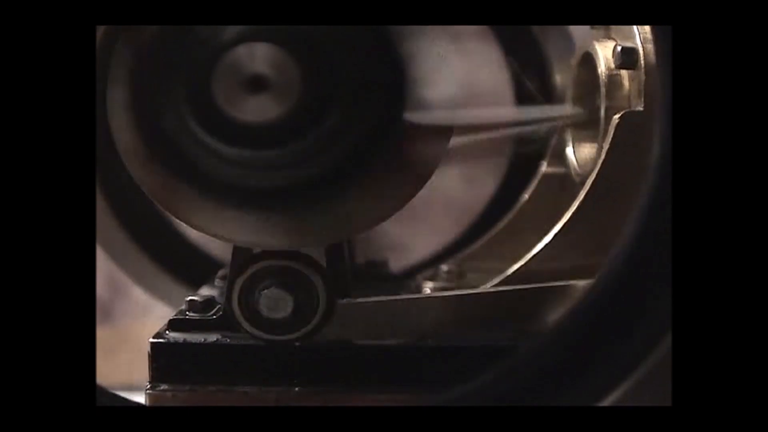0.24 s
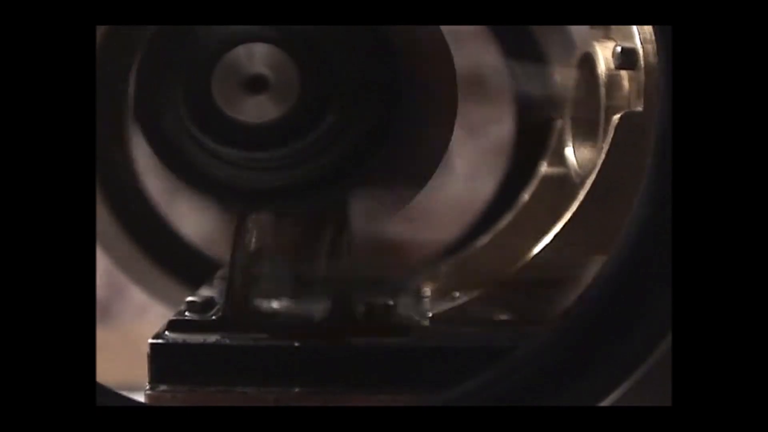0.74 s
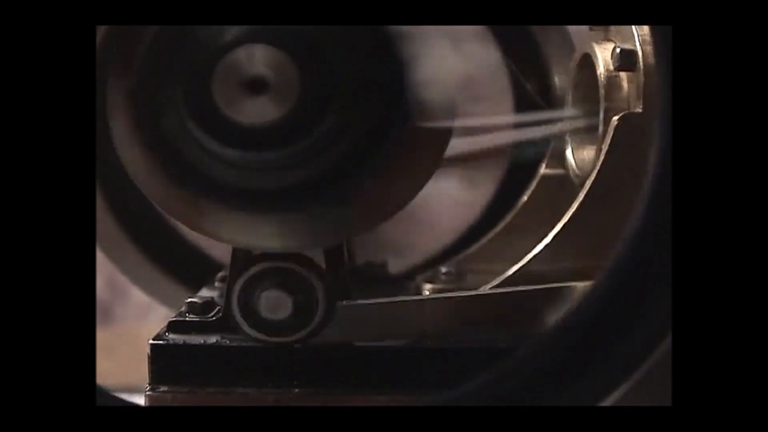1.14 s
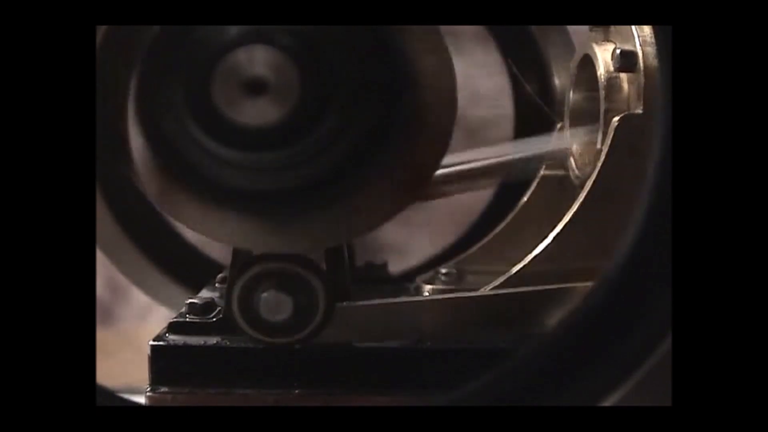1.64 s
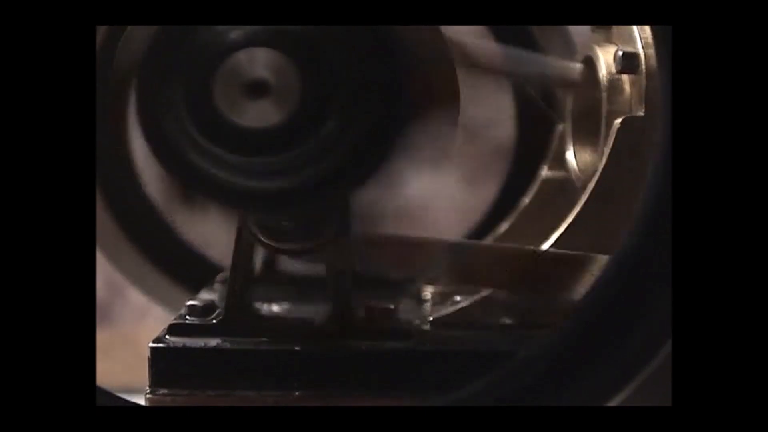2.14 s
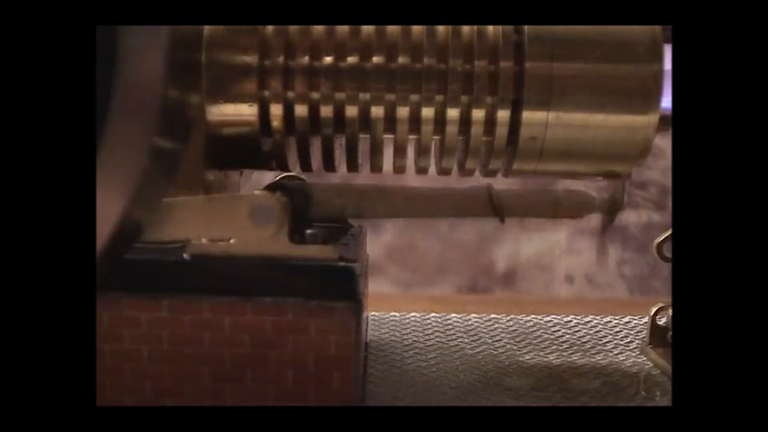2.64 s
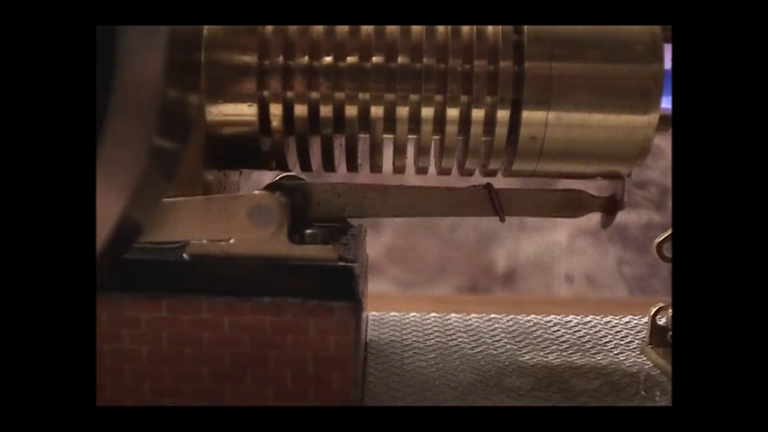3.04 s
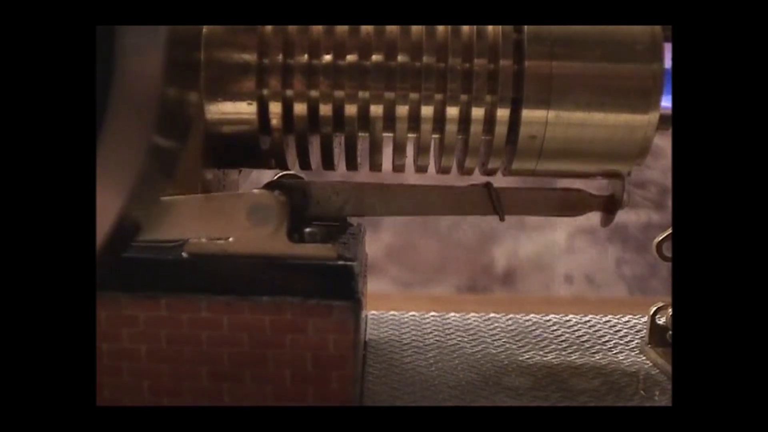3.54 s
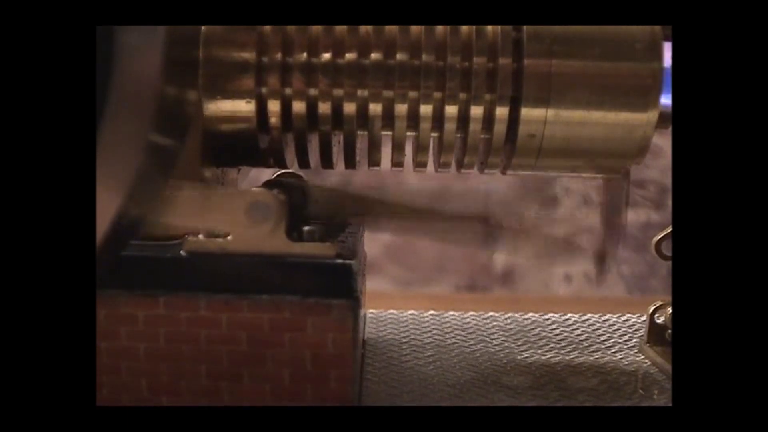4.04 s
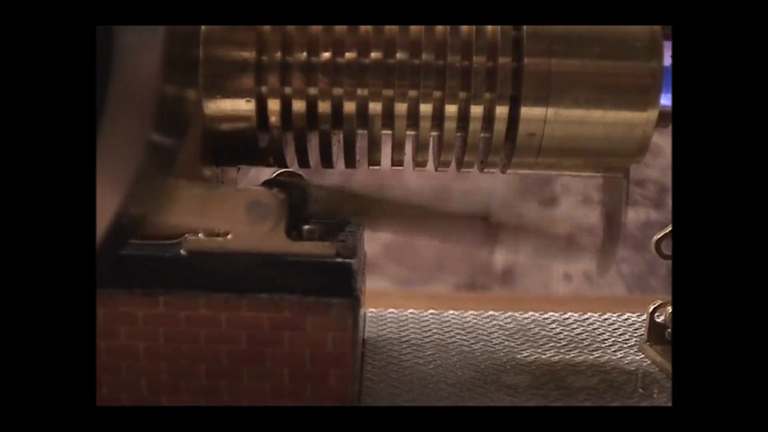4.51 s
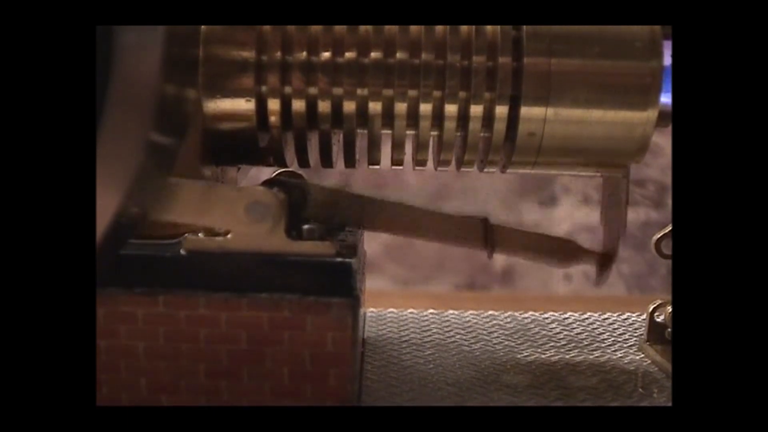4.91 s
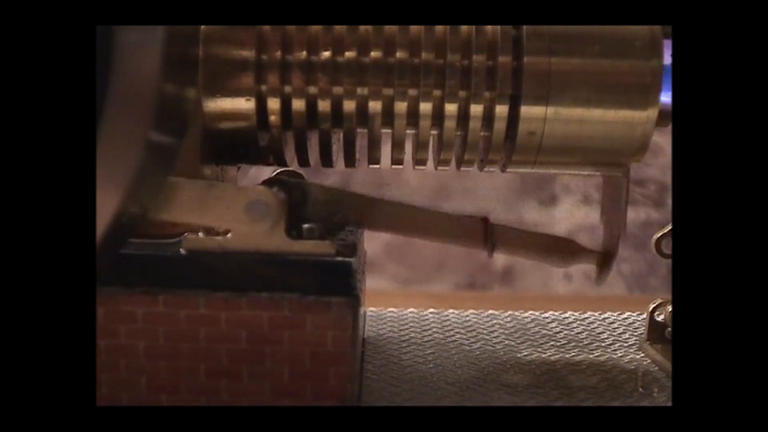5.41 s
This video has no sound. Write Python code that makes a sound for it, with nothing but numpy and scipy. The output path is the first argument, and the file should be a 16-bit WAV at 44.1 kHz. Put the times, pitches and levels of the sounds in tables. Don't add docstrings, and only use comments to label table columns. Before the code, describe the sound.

Steady, rapid mechanical chugging from a model engine on a bench, heard in close stereo. Dry brass ticks lead to a hard shutter clack, a short ringing hum near a high whistle pitch, and a sputtering exhaust valve. The cut near 2.5 seconds shifts the engine from slightly right to slightly left, with more shutter bounce and less base thud. Short room reflections, faint hiss and rumble continue to the end.

```python
import sys
import numpy as np
from scipy import signal
from scipy.fft import rfft, irfft
from scipy.io import wavfile
from scipy.ndimage import uniform_filter1d

SR = 44100
rng = np.random.default_rng(int(sys.argv[2]) if len(sys.argv) > 2 else 0)


def boost(x):
    u = np.asarray(x, float) / 20
    return 10 ** u


def inscribe(sig):
    pcm = np.round(np.clip(np.atleast_2d(sig).T, -1, 1) * 32767)
    wavfile.write(sys.argv[1], SR, pcm.astype(np.int16))


N = 250047
MOVE_S = 2.466


def place(s):
    return int(s > MOVE_S)


def ring(x, hz, t60_s):
    pole = np.exp(2j * np.pi * hz / SR - np.log(1000) / (t60_s * SR))
    return signal.lfilter([1], [1, -pole], x).imag


def ring_all(x, modes):
    return sum(boost(db) * ring(x, hz, t60_s) for hz, t60_s, db in modes)


def add(track, s, wave):
    at = int(s * SR)
    wave = wave[max(-at, 0):N - at]
    start = max(at, 0)
    track[start:start + len(wave)] += wave


# t/s, snap level/dB, third beat level/dB, damping/dB per beat squared
POPS = [(0.1102, -21, -15.5, 10), (0.262, -21, -14, 6.5), (0.4145, -22, -17, 7), (0.5651, -18, -14, 3),
        (0.7185, -21, -14.5, 8), (0.8701, -20.5, -16, 9), (1.0238, -21.5, -11.5, 7), (1.1763, -21, -18, 13),
        (1.3279, -19.5, -15.5, 14), (1.4824, -19.5, -16, 8), (1.6357, -19.5, -13.5, 8.5),
        (1.7902, -20, -16.5, 4.4), (1.9448, -20.5, -14.5, 19), (2.0986, -19.5, -16.5, 7),
        (2.254, -20.5, -16, 1.2), (2.408, -20.5, -15.5, 4.5)] + [(2.5798, -20, -26, 5.6), (2.708, -17, -23.5, 7.7), (2.837, -17.5, -25.5, 9.7),
                            (2.9646, -18.5, -28.5, 4.4), (3.0933, -18, -25.5, 6.7),
                            (3.2212, -17, -19.5, 11), (3.3486, -20, -17.5, 3.1), (3.4759, -19, -18.5, 5.5),
                            (3.6047, -21.5, -19, 4.7), (3.7323, -21, -20, 7.7), (3.861, -18, -16, 3.2),
                            (3.9899, -19.5, -15.5, 3.4), (4.1196, -20.5, -24.5, 7.7), (4.248, -20, -19, 11),
                            (4.378, -22.5, -17, 14), (4.508, -19.5, -16.5, 10), (4.638, -20, -20.5, 3),
                            (4.7666, -20.5, -16.5, 4), (4.8973, -21, -18.5, 7.7), (5.0264, -20, -17.5, 6),
                            (5.156, -19.5, -20, 4.6), (5.2863, -20, -15.5, 3.5),
                            (5.4163, -20.5, -16.5, 5.3), (5.547, -20.5, -16.5, 2.2)]
# beat/s, first beat level/dB, snap f/Hz, snap fade/s
POP = [
    (0.00359, -16.5, 3360, 0.00011),
    (0.003395, -20, 2760, 0.00033),
]
SECOND_BEAT_DB = (-25, -22)
# f/Hz, t60/s, level/dB
PORT_MODES = [(260.2, 0.028, -2.5), (480, 0.012, -22.5), (541, 0.019, -6.5), (630, 0.0079, -24.5),
              (1120, 0.0033, -1.5)]
FLUTTER_RISE_DB = 5.5


def pops():
    snaps, puffs = np.zeros(N), np.zeros(N)
    t = np.arange(-60, 200) / SR
    puff = np.gradient(np.hanning(44))
    late_beat = np.arange(4)
    for (s, snap_db, third_db, damping_db), chance in zip(POPS, rng.standard_normal((len(POPS), 6))):
        beat_s, first_db, snap_hz, snap_fade_s = POP[place(s)]
        late_db = third_db + FLUTTER_RISE_DB * late_beat - damping_db * late_beat ** 2
        for k, db in enumerate([first_db, SECOND_BEAT_DB[place(s)], *late_db]):
            lag_s = beat_s * k * (1 - 0.018 * k)
            jitter_s = 0.00015 * chance[k] * (k > 0)
            add(puffs, s - .0007 + lag_s + jitter_s, boost(db) * puff)
        fade = np.exp(-np.abs(t) / np.where(t < 0, .00025, snap_fade_s))
        add(snaps, s + t[0], boost(snap_db + 12.0) * fade * np.cos(2 * np.pi * snap_hz * t))
    return snaps + ring_all(puffs, PORT_MODES)


# knock f/Hz, knock fade/s, hum f/Hz, sag share, sag/s,
# swell level/dB, swell fade/s, hum level/dB, hum fade/s
PING = [
    (1782, 0.0016, 941, 0.33, 0.002, -10, 0.0036, -16, 0.042),
    (1777, 0.0022, 955, 0.24, 0.0028, 0.5, 0.0024, -21.5, 0.061),
]
# knock sag share, neighbour f/Hz, neighbour level/dB, fade/s, leak level/dB
BESIDE = [
    (0.75, 1040, -17, 0.0044, -28),
    (0.083, 760, -50, 0.049, -46),
]


def pings(seals):
    out = np.zeros(N)
    pop_s = np.append(np.array(POPS)[:, 0], N / SR)
    leak = ring(rng.standard_normal(N), hz=1920, t60_s=0.0051)
    leak /= np.std(leak)
    for (s, db), chance in zip(seals, rng.standard_normal((len(seals), 8))):
        knock_hz, knock_fade_s, hum_hz, sag, sag_s, *levels = PING[place(s)]
        swell_db, swell_fade_s, hum_db, hum_fade_s = levels
        knock_sag, beside_hz, beside_db, beside_fade_s, leak_db = BESIDE[place(s)]
        t = np.arange(int((pop_s[pop_s > s][0] - s) * SR)) / SR
        hum_fade = np.exp(-t / hum_fade_s)

        knock_sweep_hz = knock_hz * (1 + knock_sag * (np.exp(-t / 0.0022) - .6))
        knock = np.sin(2 * np.pi * np.cumsum(knock_sweep_hz) / SR)
        knock *= np.clip(t / .0005, 0, 1) * np.exp(-t / knock_fade_s)

        beside = boost(beside_db) * np.exp(-t / beside_fade_s) * np.sin(2 * np.pi * beside_hz * t)
        beside += boost(leak_db) * hum_fade * leak[int(s * SR):][:len(t)]

        phase = 2 * np.pi * np.cumsum(hum_hz * (1 + sag * np.exp(-t / sag_s))) / SR
        waver = boost(2.2 * np.interp(t, np.linspace(0, t[-1], 8), chance))
        size = boost(swell_db) * np.exp(-t / swell_fade_s) + boost(hum_db) * waver * hum_fade
        sealed = np.clip(t / .0025, 0, 1) * np.clip((t[-1] - t) / .002, 0, 1)
        add(out, s, boost(db) * (knock + sealed * (size * np.sin(phase) + beside)))
    return out


# whole turns made, t/s
CRANK = [
    [(-1, -.151), (0, .0003), (4, .6077), (8, 1.218), (12, 1.8321), (17, 2.6056)],
    [(-1, 2.3576), (0, 2.486), (6, 3.2553), (10, 3.7679), (14, 4.2839), (19, 4.9319), (25, 5.7127)],
]
# crank angle/turns, level/dB, drift/dB per turn, scatter/dB, scatter/s
TURN_NEAR = [
    (-.113, -43, -.25, 3, .0008),
    (-.0745, -22, -0.1, -1, .0002),
    (0, -25.5, 0, -2.45, 0.00022),
    (.05, -36, 0, 1.8, .0005),
    (0.148, -35.5, -0.15, -1.5, .0013),
    (.285, -24, -0.15, 0.1, 0.00036),
    (.353, -17, 0.02, -1, .0004),
    (.378, -9, -0.05, 0.1, .0004),
]
TURN_FAR = [
    (-.124, -38.5, 0.21, 7.1, 0.00076),
    (-.072, -26, 0.076, 0.94, .0002),
    (0, -23.5, 0, 2.7, 0.00016),
    (.04, -35.5, 0, 1.8, 0.00043),
    (.16, -45.5, 0.32, 1.3, 0.0042),
    (.281, -28, 0, 2, .0006),
    (.355, -16, 0, 0.72, .0002),
    (.381, -12.5, 0.054, 0.48, .0004),
]


def turning():
    kinds = [[] for _ in TURN_NEAR]
    for second, (crank, turn) in enumerate(zip(CRANK, (TURN_NEAR, TURN_FAR))):
        made, at_s = np.transpose(crank)
        count = np.arange(made[-1] + 1)
        for kind, (angle, db, drift_db, scatter_db, scatter_s) in zip(kinds, turn):
            late, strong = rng.standard_normal((len(count), 2)).T
            s = np.interp(count + angle, made, at_s) + scatter_s * late
            level_db = db + drift_db * count + scatter_db * strong
            heard = (s > MOVE_S) & (s < N / SR) if second else (s > 0) & (s < MOVE_S)
            kind += list(zip(s[heard], level_db[heard]))
    return kinds


def blows(events, chatter_s):
    out, t = np.zeros(N), np.arange(600) / SR
    repeat = .85
    shape = np.exp(-t / chatter_s) * (1 - np.exp(-t / (0.41 * chatter_s))) ** 2
    shape /= np.sqrt(np.sum(shape ** 2))
    habit = np.sign(rng.standard_normal(600))
    for (s, db, *_), grit in zip(events, rng.standard_normal((len(events), 600))):
        chatter = np.sqrt(repeat) * habit + np.sqrt(1 - repeat) * grit
        add(out, s - .0003, boost(db) * shape * chatter)
    return out


# lead/s, level/dB
SLIDE = [
    (.0075, -37.5),
    (.008, -39.5),
]
# lag/s, level/dB
BOUNCE = [
    [(.0035, -32), (.0065, -27)],
    [(.003, -8), (.0072, -15.5)],
]
# f/Hz, t60/s, level/dB first place, level/dB second place
FRAME_MODES = [(1164, 0.016, 8.5, 3), (1866, 0.0041, 7.5, -4.5), (2513, 0.009, -3, 5),
               (3120, 0.0043, 3.5, 0.5), (3743, 0.0052, 4.5, 2), (4730, 0.0029, -1.5, -4.5),
               (5710, 0.0022, 2.5, -1.5), (6560, 0.0076, 6, 3), (7690, 0.008, -3, -12),
               (8585, 0.0043, -1, 9.5), (9580, 0.0046, -3.5, -66), (11520, 0.01, -10, -2)]
# chatter/s, level/dB into each frame mode
REACH = [
    (0.0014, -12.5, 19, 7, 17, -49, 2, -63, -73, -40, -65, -26, -36),
    (0.00057, -18, -28, -6, -36, 3.5, -26, 12.5, -10, -26, -2.5, -36, -13),
    (0.0021, -7, -3, -24, -83, 3.5, -41, 8.5, 4.5, -30, -2, -46, -9),
    (0.0021, -7, -33, -61, -5, 14, -40, 13, 8.5, 13.5, 6, -31, -26),
    (0.00057, -38, -17, 7.5, -26, 6.5, -20, -2, 6.5, -15, 17, 8, -25),
         (0.0066, -3, -43, -1, -6, 12.5, 17, 15.5, -2, 11.5, -21, 18, -30),
    (0.00094, -13, 2, 2, 0, 3, 2, -30, -63, -33, -64, -41, -40),
    (0.0011, -53, -11.5, -13, -16.5, -1, -33, 5, -5, -29, -3, -21, -13.5),
    (0.0015, -19.5, -1.5, -4, -8.5, -6, -4.5, -24, -49, -48, -48, -46, -17),
    (0.001, -41, 2.5, -8, -14, 2, 3, -3.5, -31, -8, -69, -94, -52),
]


def frame(second, hits):
    slide = []
    for s, _ in hits[5]:
        lead_s, slide_db = SLIDE[place(s)]
        slide.append((s - lead_s, slide_db))
    clack = list(hits[6])
    for s, db in hits[6]:
        clack += [(s + lag_s, db + less_db) for lag_s, less_db in BOUNCE[place(s)]]
    kinds = *hits[:5], slide, hits[5], clack, hits[7], POPS
    reach = np.array(REACH)
    bursts = [blows(events, chatter_s) for events, chatter_s in zip(kinds, reach[:, 0])]
    drive = boost(reach[:, 1:]).T @ bursts
    middle, side = np.zeros(N), np.zeros(N)
    for k, (x, (hz, t60_s, first_db, second_db)) in enumerate(zip(drive, FRAME_MODES)):
        rung = ring(x * boost(np.where(second, second_db, first_db)), hz, t60_s)
        middle += rung
        late = np.roll(rung, round(SR / hz / 4))
        side += (-1) ** k * late * boost(-19.0 + 1.56 * hz / 1000)
    no_bass = signal.butter(2, 750, "highpass", fs=SR, output="sos")
    return signal.sosfilt(no_bass, [middle, side])


# f/Hz, t60/s, level/dB
BASE_MODES = [(226, 0.037, -12.5), (317, 0.077, -8.5), (489, 0.029, -7), (670, .015, -17)]
THUD_DB = (-8, -16.5)


def thuds(clacks):
    push = np.zeros(N)
    for s, db in clacks:
        add(push, s, boost(db + THUD_DB[place(s)]) * np.hanning(int(0.0025 * SR)))
    return ring_all(np.diff(push, prepend=0), BASE_MODES)


# f/Hz, t60/s, level/dB
BENCH_MODES = [(296, 0.45, -38.5), (400, 0.058, -8), (520, 0.14, -33.5), (1950, 0.021, -27.5)]


def bench(engine):
    return ring_all(np.diff(engine, prepend=0), BENCH_MODES)


# f/Hz, t60/s, level/dB
ROOM_BANDS = [(223, 1, -14.5), (835, 1, -13.5), (2200, 0.033, 0), (4630, 0.089, -37), (9200, 0.02, 2)]


def room(x):
    t, tail = np.arange(int(.35 * SR)) / SR, 0
    for hz, t60_s, db in ROOM_BANDS:
        band = signal.butter(2, [hz / 1.7, hz * 1.7], "bandpass", fs=SR, output="sos")
        fading = signal.sosfilt(band, rng.standard_normal((2, len(t)))) * boost(-60 * t / t60_s)
        tail = tail + boost(db) * fading / np.sqrt(np.sum(fading ** 2) * SR / (4 * hz))
    return signal.fftconvolve(x[None], tail * np.clip(t / 0.012, 0, 1), axes=1)[:, :N]


def coloured(points):
    hz, db = np.transpose(points)
    bins_hz = np.arange(N // 2 + 1) * SR / N + 1
    gain = boost(np.interp(np.log(bins_hz), np.log(hz), db))
    x = irfft(rfft(rng.standard_normal(N)) * gain, N)
    return x / np.std(x)


# f/Hz, level/dB per Hz
HISS = [(24, -58), (40, 6.5), (156, 2.5), (291, 11.5), (765, -3), (956, 6.5), (1420, -11.5), (1690, 1.5),
        (4340, -9.5), (6620, -12.5), (15000, -31)]


def burner_hiss(across):
    return boost(-41.5) * (coloured(HISS) + 0.21 * coloured(HISS) * across)


def mains_hum():
    return boost(-57.5) * np.sin(2 * np.pi * 124.4 * np.arange(N) / SR)


# f/Hz, level/dB per Hz
RUMBLE = [(15, -30), (25, -3), (70, -1.5), (170, -20), (400, -33.5)]


def rumble(exhaust, across):
    shake, shake_s = 1, 0.022
    jolt = uniform_filter1d(np.abs(exhaust), int(shake_s * SR))
    shaken = (1 + shake * jolt / np.mean(jolt)) / (1 + shake)
    return boost(-49) * shaken * (across * coloured(RUMBLE) + .14 * coloured(RUMBLE))


PAN_DB = (-2.3, 1.8)


def scene():
    second = np.arange(N) > MOVE_S * SR
    across = np.array([[1], [-1]])
    hits = turning()
    brass, uneven = frame(second, hits)
    exhaust, sealed = pops(), pings(hits[7])
    uneven = uneven + boost(-9) * np.gradient(exhaust + sealed)
    engine = brass + sealed + exhaust + thuds(hits[5] + hits[6])
    engine = engine + bench(engine)
    pan_db = np.where(second, PAN_DB[1], PAN_DB[0])
    background = burner_hiss(across) + mains_hum()
    air = engine * boost(across * pan_db / 2) + across * uneven + room(engine) + background
    mic_low = signal.butter(3, 98, "highpass", fs=SR, output="sos")
    return signal.sosfilt(mic_low, air) + rumble(exhaust, across)


def band_limit(x):
    return signal.sosfilt(signal.butter(12, 16640, fs=SR, output="sos"), x)


def record(dry):
    squash = 2.0
    rounded = np.tanh(squash * dry) / squash
    dull = signal.sosfilt(signal.butter(2, 10360, fs=SR, output="sos"), rounded)
    mix = signal.sosfilt(signal.ellip(8, .2, 60, 15900, fs=SR, output="sos"), dull)
    return band_limit(mix)


dry = scene()
out = record(dry)
inscribe(out)
```